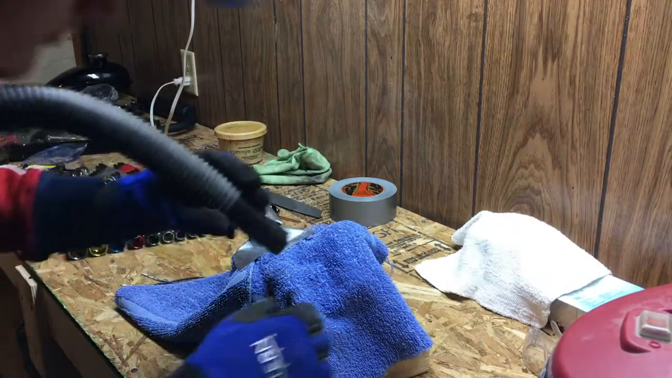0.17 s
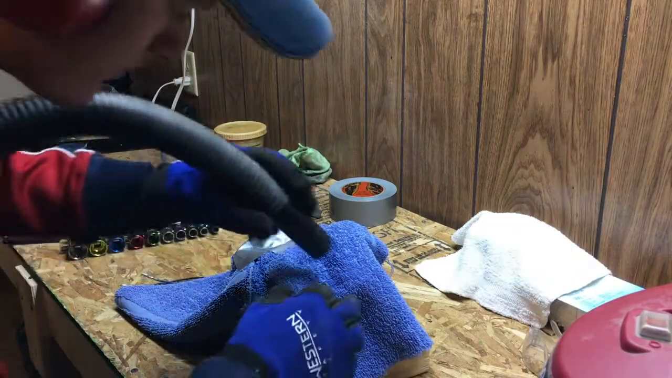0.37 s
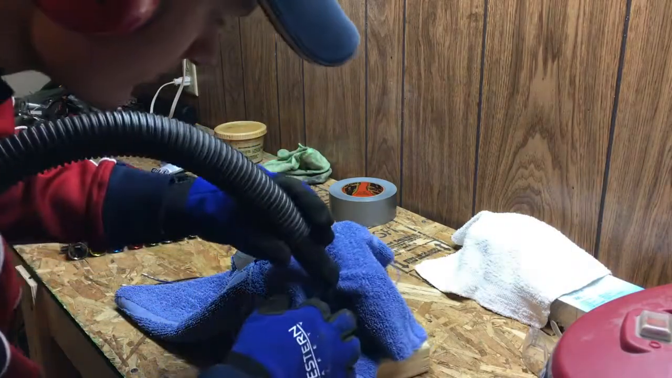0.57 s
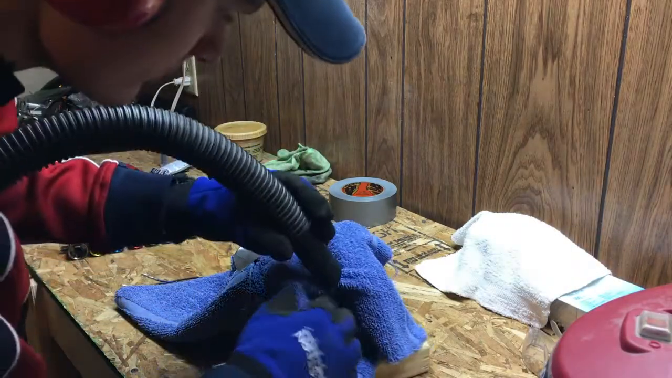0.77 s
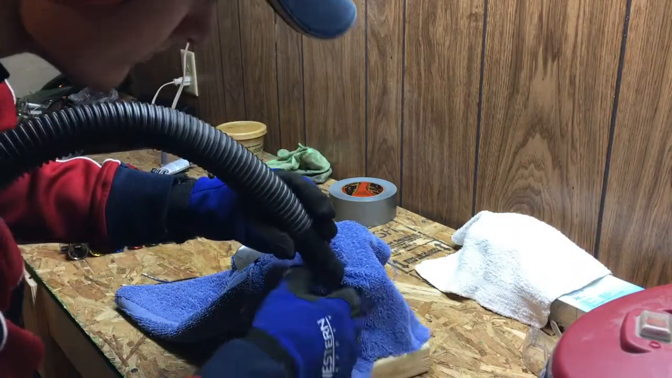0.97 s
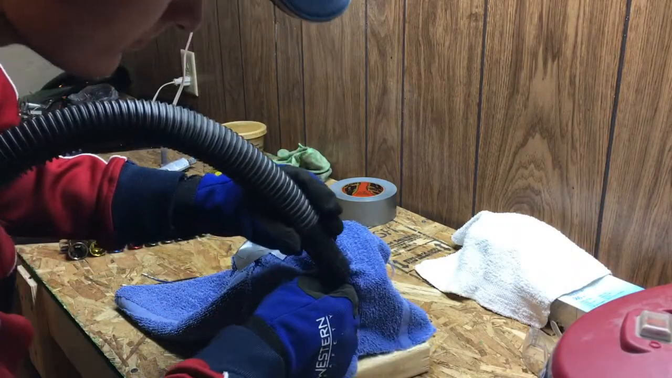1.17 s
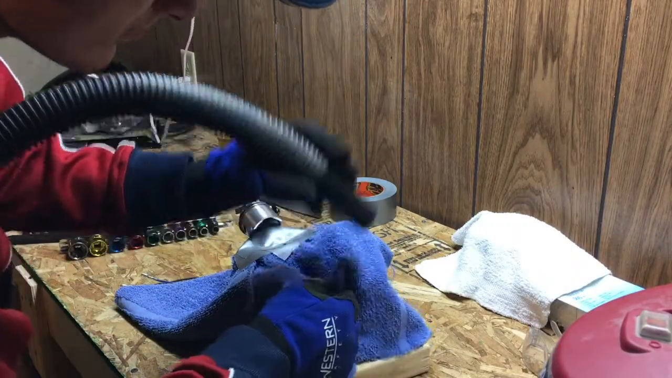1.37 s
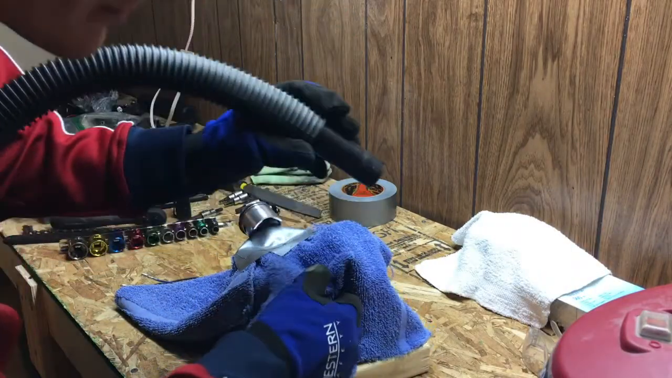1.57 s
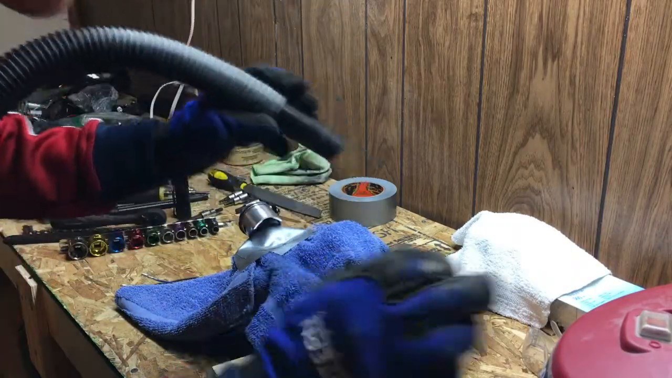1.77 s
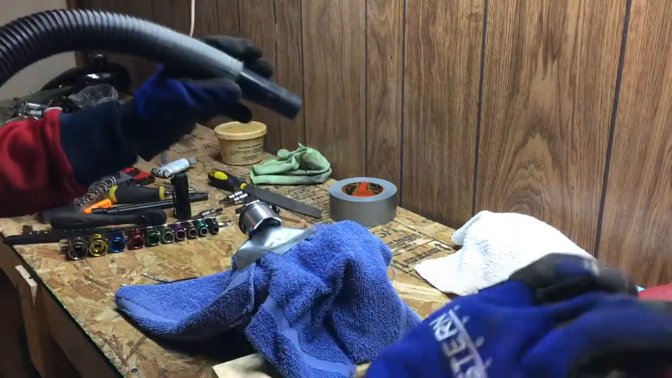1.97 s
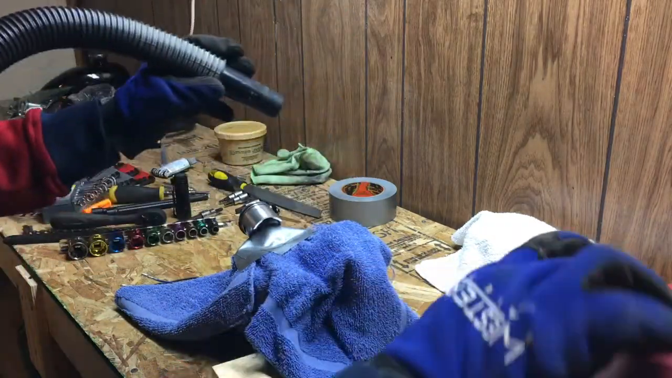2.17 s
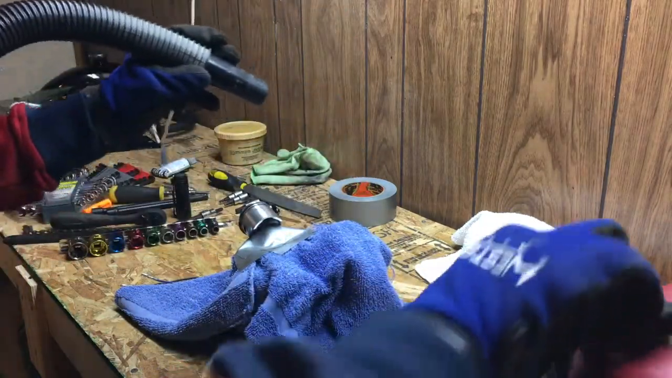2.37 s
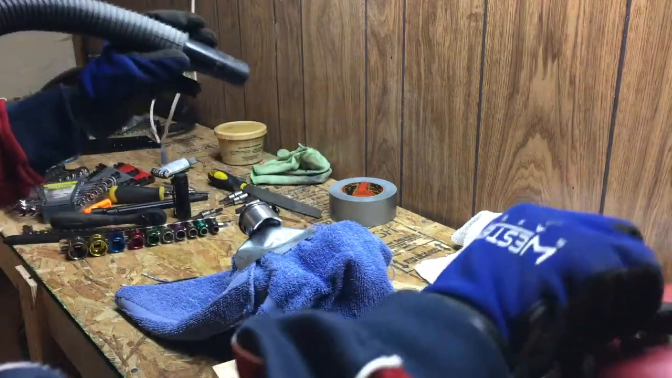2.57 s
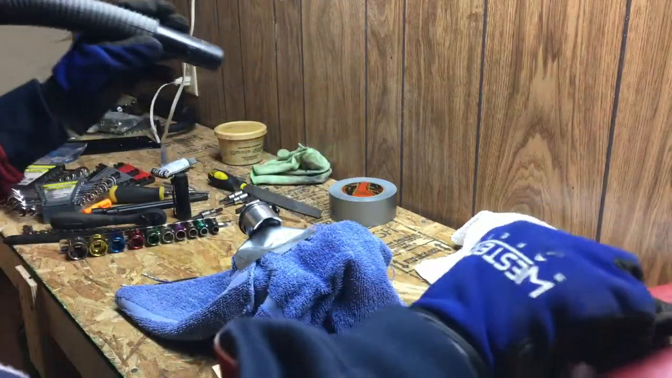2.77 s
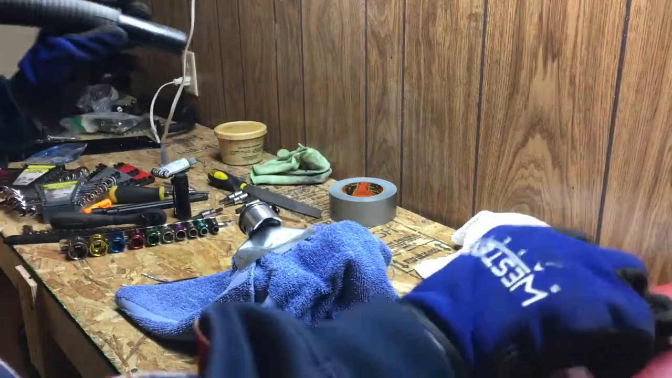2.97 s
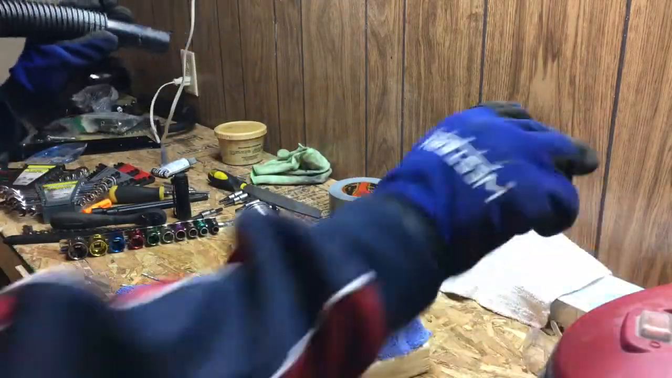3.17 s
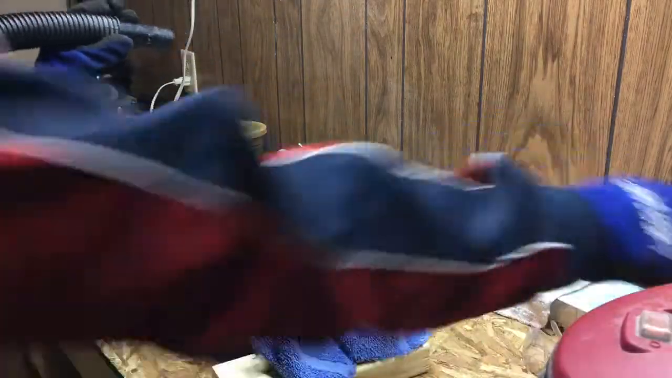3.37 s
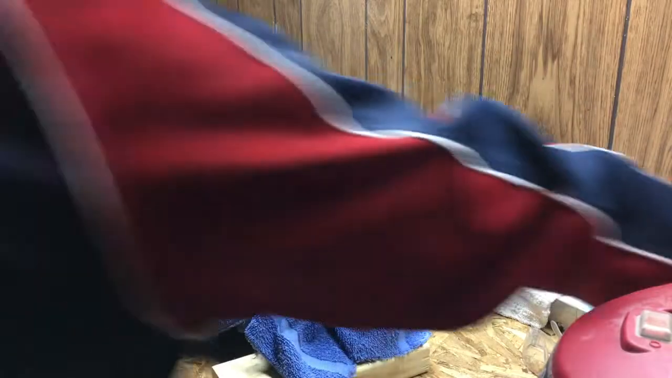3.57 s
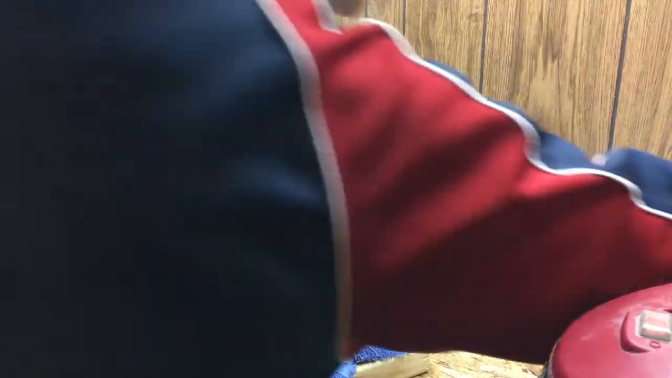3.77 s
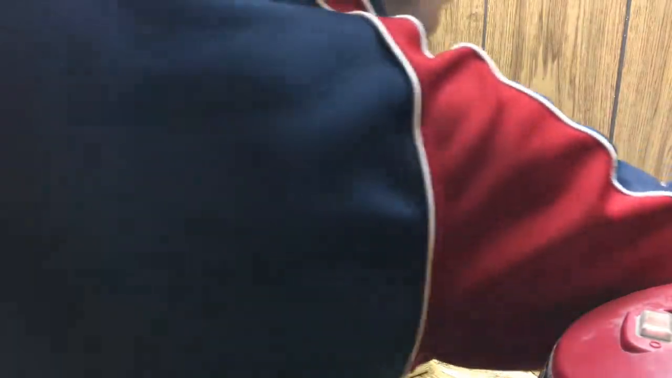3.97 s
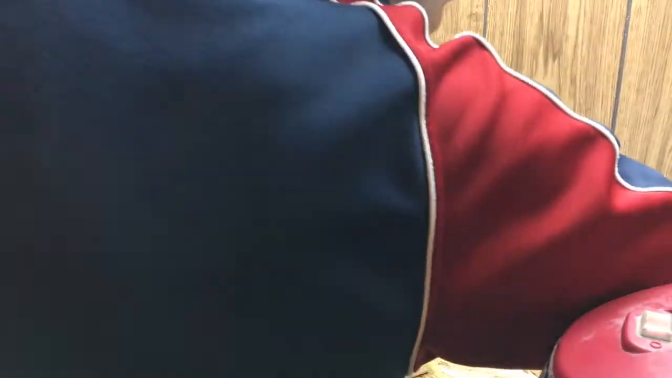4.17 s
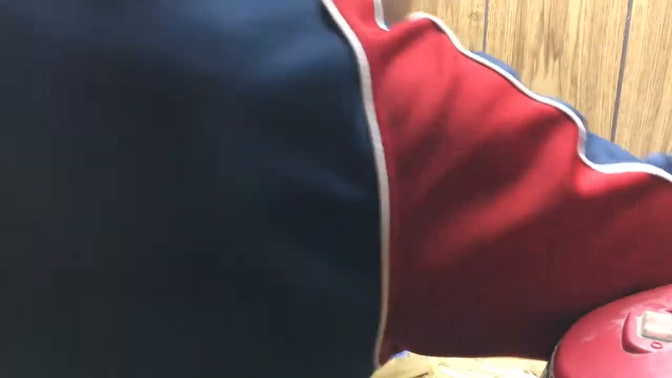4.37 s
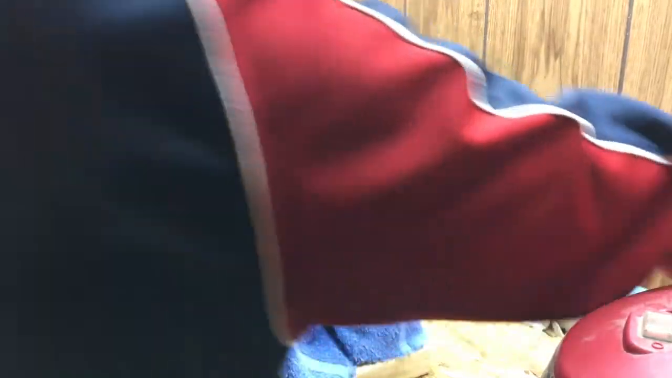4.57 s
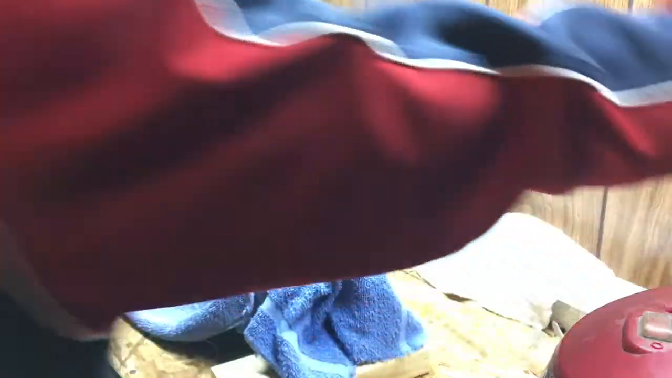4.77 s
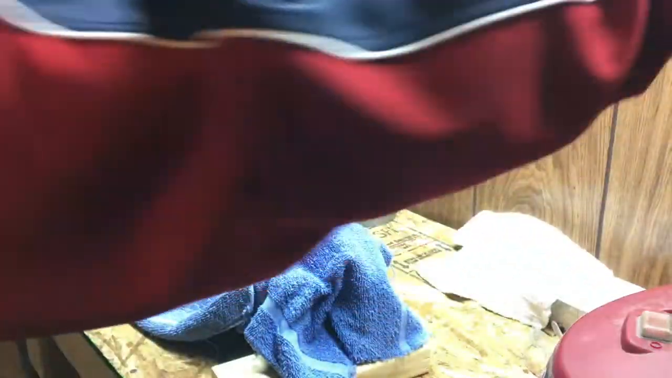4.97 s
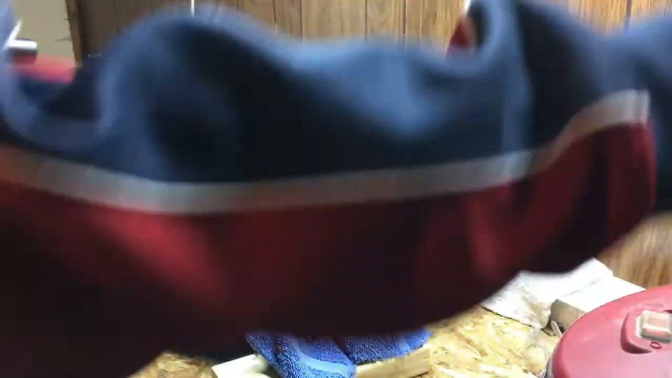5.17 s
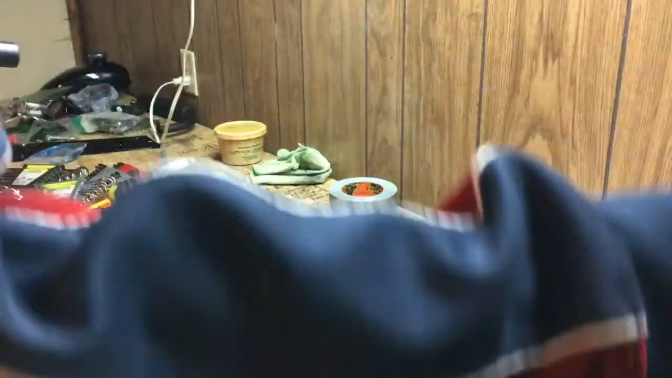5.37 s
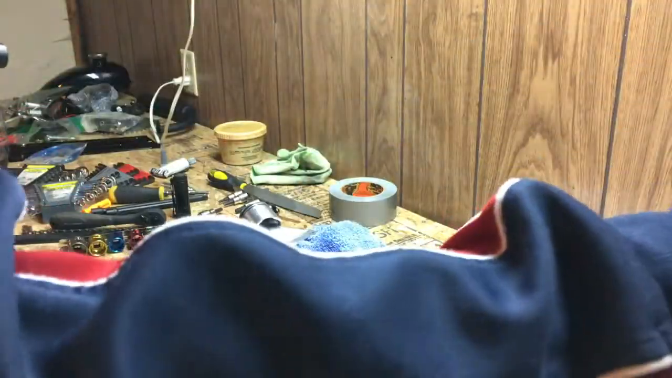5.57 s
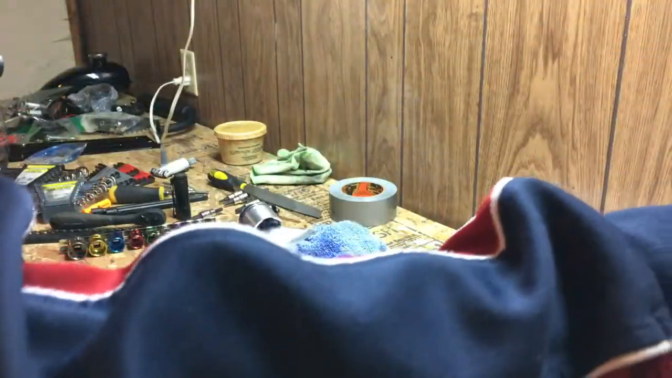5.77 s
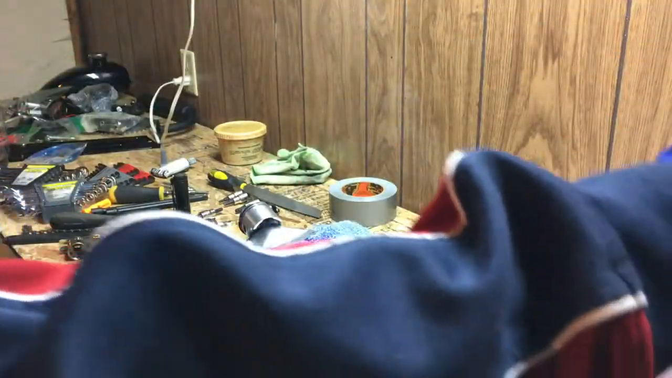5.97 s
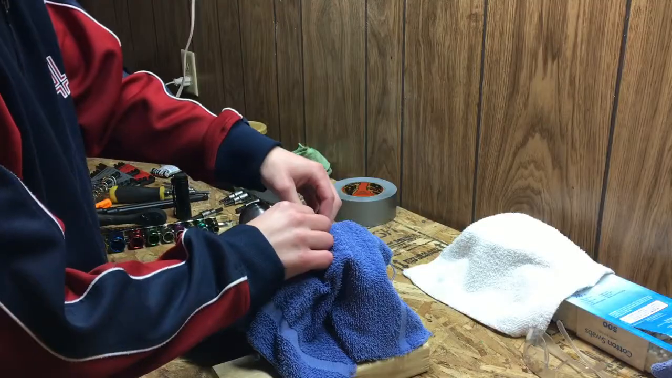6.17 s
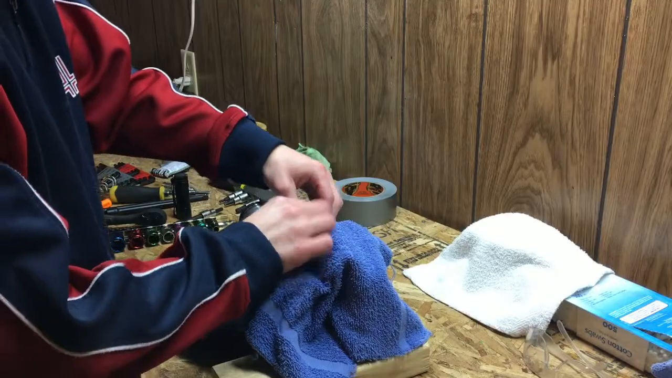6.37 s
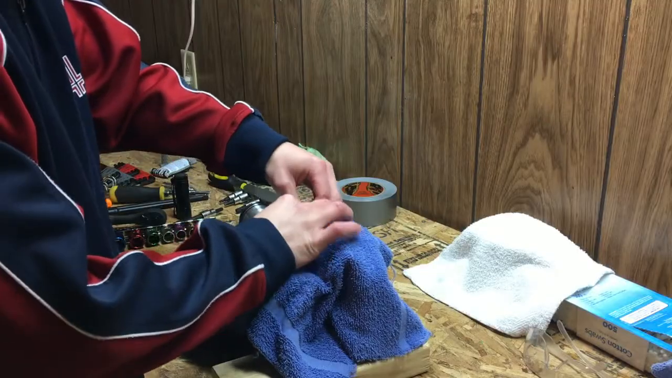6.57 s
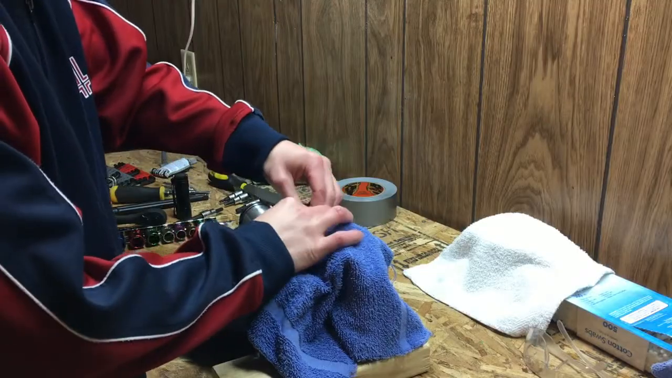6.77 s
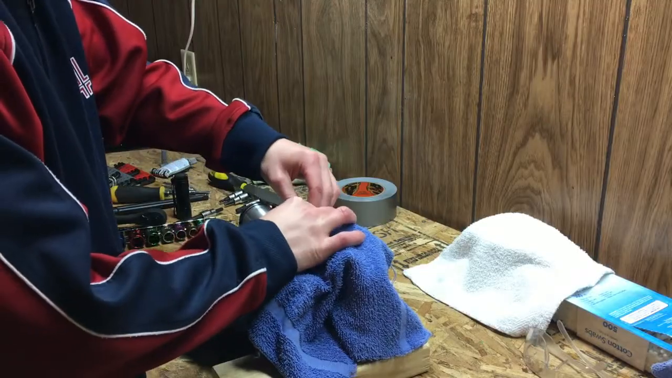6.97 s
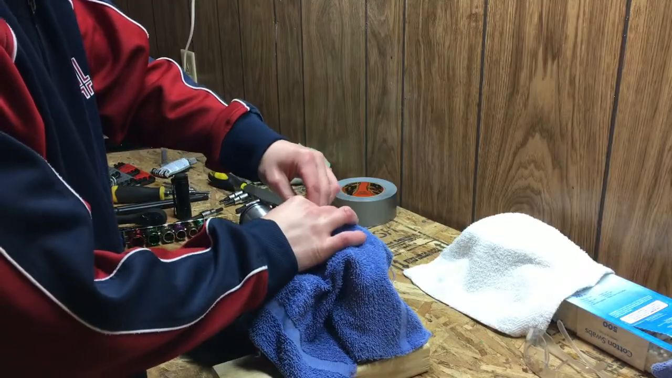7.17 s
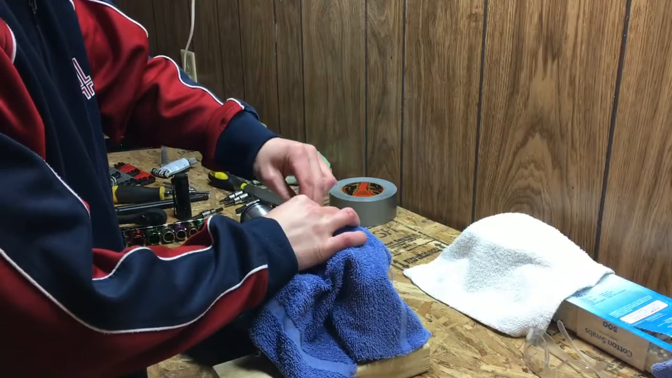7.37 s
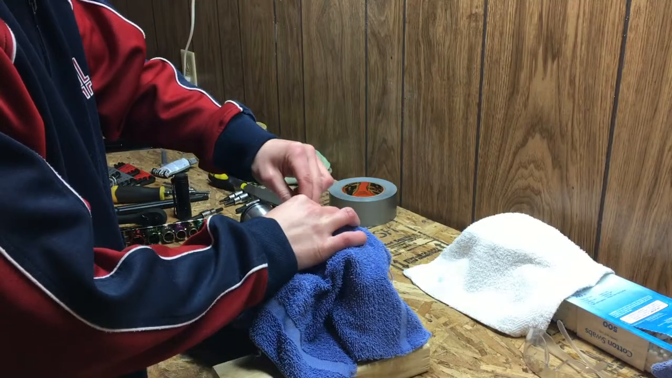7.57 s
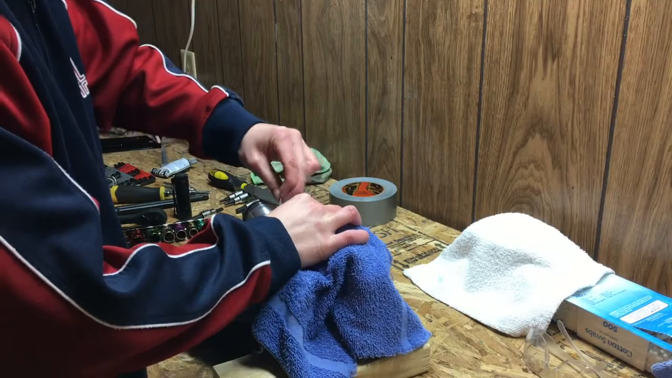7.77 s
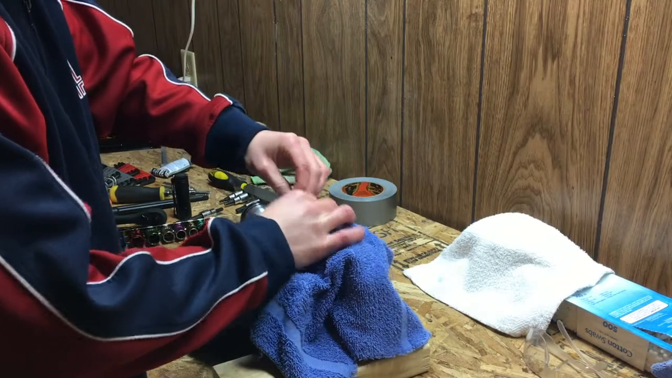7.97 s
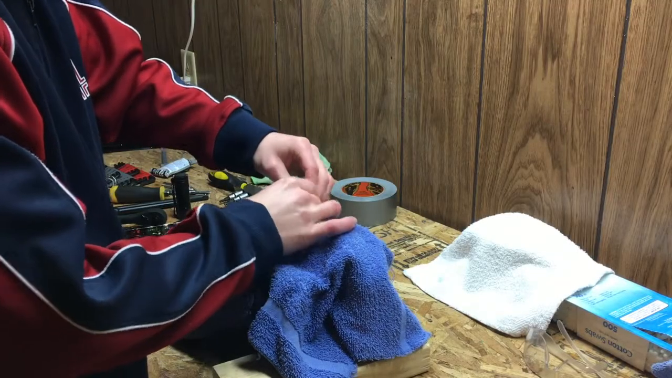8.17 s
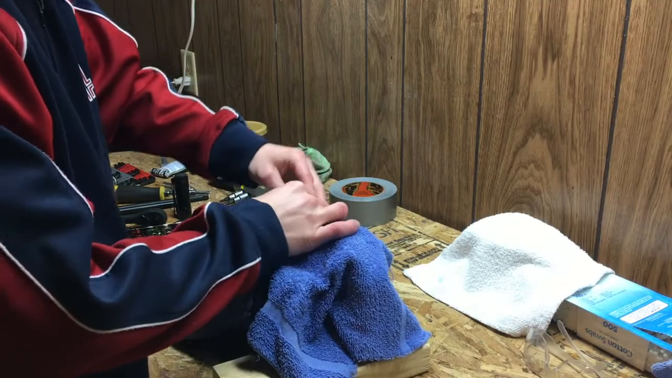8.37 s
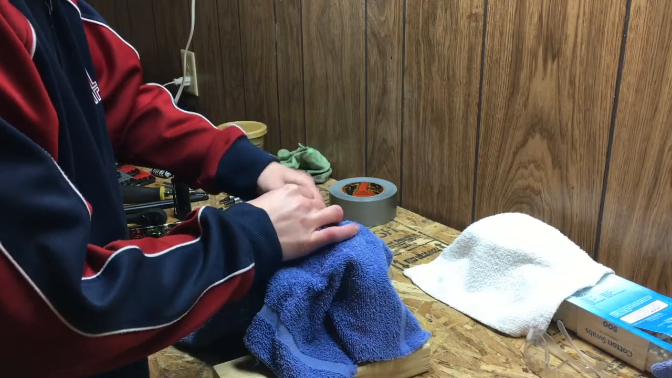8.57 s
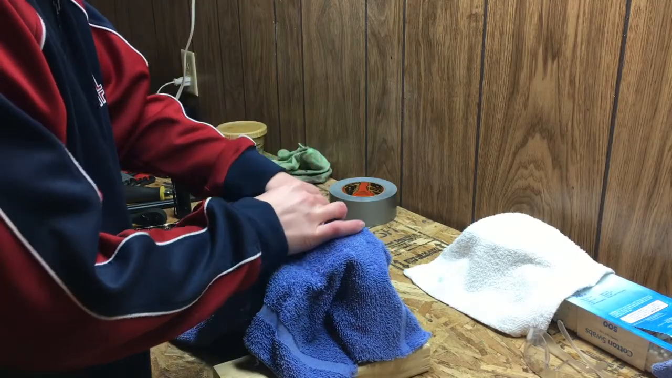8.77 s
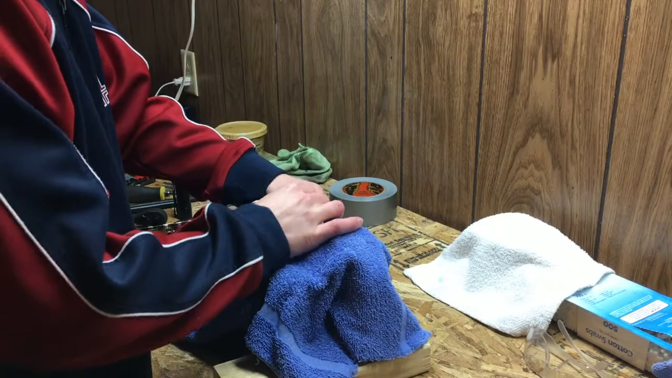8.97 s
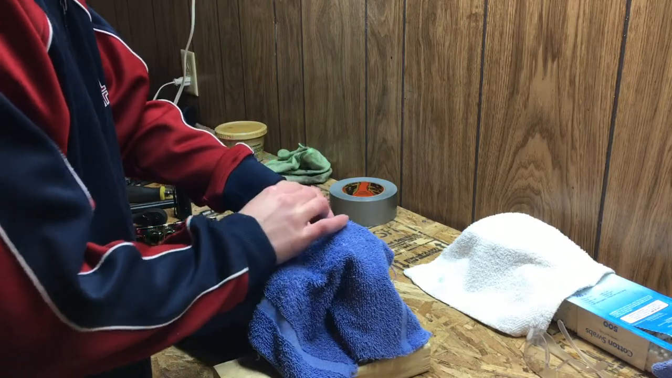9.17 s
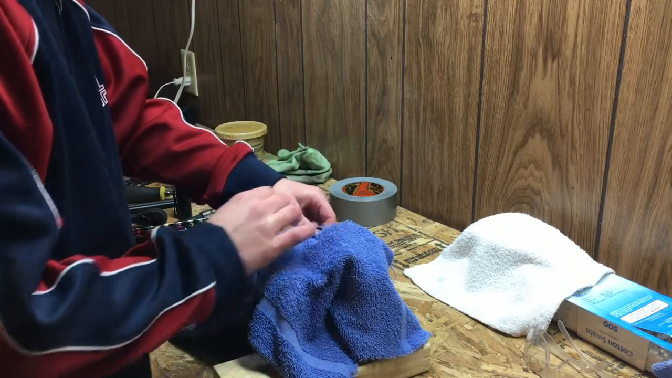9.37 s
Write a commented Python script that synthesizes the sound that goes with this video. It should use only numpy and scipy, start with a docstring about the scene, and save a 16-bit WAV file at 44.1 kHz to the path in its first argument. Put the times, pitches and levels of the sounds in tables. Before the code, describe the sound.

A shop vacuum rushes and whines steadily close by in a small workshop. A towel briefly chokes the nozzle and the pitch rises, then eases back. Switched off, it coasts down in a long falling whine, jumping louder once partway, with bumps, scrapes and small metal clinks over it. The last whirr stops short, leaving mains hum, a few hard bench knocks, light clicks and a final soft thump with cloth rustle. One microphone, slight room echo.

```python
"""A shop vacuum rushes and whines over a mains hum, and speeds up while a towel chokes its nozzle.
Switched off, it coasts down: shaft speed drives air noise, fan tones and brushes singing on the commutator.
The level steps up once during the run-down, and later the whirr stops short.
Rubs, scrapes and rattles (noise swells), blows on a wooden bench and sheet metal (filtered bursts, thuds)
and steel clinks (decaying sines) echo in the workshop; one microphone."""
import sys
import numpy as np
from scipy import signal
from scipy.fft import rfft, irfft
from scipy.io import wavfile

SR = 44100
rng = np.random.default_rng(int(sys.argv[2]) if len(sys.argv) > 2 else 0)


def to_wav(sig):
    """Store sig (one row per channel, or 1-D mono) as 16-bit WAV at the path in sys.argv[1].

    Samples outside -1..1 are clipped; the rate is SR.
    """
    pcm = np.clip(np.atleast_2d(sig), -1, 1) * 32767
    pcm = np.round(pcm).astype(np.int16)
    wavfile.write(sys.argv[1], SR, pcm.T)  # frames by channels


N = 415422
TIME_S = np.arange(N) / SR
BIN_HZ = np.maximum(np.arange(N // 2 + 1) * SR / N, 1)
CUTOFF_HZ = 15900
MAINS_HZ = 60
OFF_S, STEP_S, STOP_S = 2.444, 3.24, 6.02  # motor power off, level step, end of whirr
START_TURNS_PER_S, FULL_TURNS_PER_S, CHOKED_TURNS_PER_S = 414, 418, 435.5


def from_db(db):
    """Decibels to gain."""
    return 10 ** (np.asarray(db) / 20)


def rms_one(x):
    """Scale to an rms of 1."""
    return x / np.sqrt(np.mean(x ** 2) + 1e-20)


def at_hz(points, hz):
    """Read a spectrum on a log-frequency axis."""
    point_hz, point_db = np.array(points)[:, :2].T
    return np.interp(np.log(hz), np.log(point_hz), point_db)


def bell(hz, centre_hz, width_hz):
    """Power response of one resonance."""
    return 1 / (1 + (2 * (hz - centre_hz) / width_hz) ** 2)


def noise(spectrum, modes=()):
    """Noise with a broad colour, lifted at its resonances; rms 1."""
    lift_db = sum(lift * bell(BIN_HZ, hz, width) for hz, width, lift in modes)
    white = rfft(rng.standard_normal(N))
    return rms_one(irfft(white * from_db(at_hz(spectrum, BIN_HZ) + lift_db), N))


def split(x, centres_hz):
    """Overlapping bands that add up to x again."""
    whole = rfft(x)
    shares = np.eye(len(centres_hz))
    return [irfft(whole * np.interp(np.log(BIN_HZ), np.log(centres_hz), share), N) for share in shares]


def drift(rate_hz):
    """Slow random wander; rms 1."""
    return rms_one(irfft(rfft(rng.standard_normal(N)) / (1 + (BIN_HZ / rate_hz) ** 2), N))


# echo bands: f/Hz, t60/s, relative level/dB
WORKSHOP_ECHO = [(81.4, 0.58, 4), (254, 0.64, -5), (700, 0.31, -5), (2000, 0.61, -6), (5870, 0.13, -4),
                 (13900, 0.2, -6)]


def workshop(x):
    """Diffuse wall echoes: noise bands, each with its own decay."""
    age_s = TIME_S[:SR]
    bands = split(rng.standard_normal(N), [row[0] for row in WORKSHOP_ECHO])
    tail = 0
    for band, (_, t60_s, db) in zip(bands, WORKSHOP_ECHO):
        unit_energy = np.sqrt(2 * np.log(1000) / (t60_s * SR))
        tail = tail + band[:SR] * from_db(db - 60 * age_s / t60_s) * unit_energy
    return signal.fftconvolve(x, tail * (age_s > .004))[:N]


def settle(start_s, lag_s=.19):
    """Goes from 0 to 1 after start_s, with the lag of the motor."""
    return 1 - np.exp(-np.maximum(TIME_S - start_s, 0) / lag_s)


def shaft(choke):
    """Turns per s: a choked fan moves less air and runs faster; unpowered, friction and drag slow it."""
    running = START_TURNS_PER_S + (FULL_TURNS_PER_S - START_TURNS_PER_S) * settle(0)
    running = running + (CHOKED_TURNS_PER_S - FULL_TURNS_PER_S) * choke
    speed_shares = np.linspace(1, 0, 2000)
    # turns/s lost each s: brush friction + fan drag
    loss = 33.6 + 436 * speed_shares ** 2.12
    reached_s = OFF_S + np.cumsum(FULL_TURNS_PER_S / len(speed_shares) / loss)
    return running * np.interp(TIME_S, reached_s, speed_shares)


# machine voices: gain/dB, choked change/dB, coasting change/dB, speed under which it dies/(turns/s)
AIR_VOICE = (-16.5, -0.43, 3.5, 37.5)
WHINE_VOICE = (7.5, -1.5, -5, 129)
BRUSH_VOICE = (0.5, 0.5, -3.5, 37.5)


def voice_db(voice, turns, choke):
    """A voice's gain follows the blockage and the slowing shaft, and dies away near standstill."""
    gain_db, choked_db, coasting_db, dying_turns_per_s = voice
    # coasting change is complete below 0.4 of full speed
    coasting = np.clip((1 - turns / FULL_TURNS_PER_S) / (1 - 0.4), 0, 1)
    dying_db = 20 * np.log10(1 + (dying_turns_per_s / turns) ** 5)
    return gain_db + choked_db * choke + coasting_db * coasting - dying_db


# rushing air spectrum: f/Hz, relative density/(dB per Hz)
AIR_SPECTRUM = [(25, -27), (45, -17.5), (70, -0.5), (100, -8), (160, 1), (520, -11.5), (1000, -14),
                (2500, -1.5), (4000, -6), (8000, -9), (10700, -13.5), (12000, -8.5), (15600, -15.5)]
# drum and hose resonances: f/Hz, width/Hz, lift/dB
DRUM_MODES = [(170.4, 12, -4), (300.8, 16, 8), (360, 42, 12), (424, 39, 6.5), (723, 130, 11.5),
              (914, 243, 7.5), (1169, 220, 13.5), (1317, 43, 7.5), (1685, 155, 6), (1842, 19, 10),
              (2080, 200, 4.5), (2830, 210, 3.5), (3120, 75, 5.5), (4400, 51, 6.5), (6600, 170, 4)]
# fading of the air with speed: f/Hz, exponent of speed for amplitude
AIR_FADE = [(60, 1.18), (150, 2.24), (400, 1.77), (1100, 2.19), (2600, 2.34), (5000, 2.92), (12000, 3.8)]


def air(speed, gain_db, flutter_db):
    """Turbulence rings in drum and hose, and dulls as the fan slows."""
    centres_hz, powers = np.transpose(AIR_FADE)
    out = 0
    for band, power in zip(split(noise(AIR_SPECTRUM, DRUM_MODES), centres_hz), powers):
        out = out + band * speed ** power * from_db(flutter_db * drift(11))
    return from_db(gain_db) * out


# shaft and fan tones: multiple of shaft speed, relative level/dB, exponent of speed
SHAFT_ORDERS = [(1, -43, .7), (2, -48, .7), (3, -47, 1.2), (9, -37.5, 9), (12, -42, 5), (18, -42, .6),
                (24, -44.5, 9), (36, -51, 8)]
# duct modes that make the fan tones whistle: f/Hz, width/Hz, lift/dB
DUCT_MODES = [(1750, 300, 6), (2300, 700, 7.5), (3200, 600, 5), (3760, 200, 2), (4700, 900, -3),
              (6550, 900, 6), (7850, 200, 6), (10420, 250, 5)]
BLADES, BLADE_CHOKE_DB = 9, -16  # the blade tone needs flow through the nozzle


def whine(angle, speed, choke, waver):
    """Unbalance and fan blades give tones that waver in the turbulent air."""
    out = 0
    for multiple, db, power in SHAFT_ORDERS:
        tone_hz = multiple * speed * FULL_TURNS_PER_S
        lift_db = sum(lift * bell(tone_hz, hz, width) for hz, width, lift in DUCT_MODES)
        lift_db = lift_db + BLADE_CHOKE_DB * choke * (multiple == BLADES)
        tone = (1 + waver * drift(21)) * np.sin(multiple * angle)
        tone = tone + waver * drift(25) * np.cos(multiple * angle)
        out = out + np.sqrt(2) * from_db(db + lift_db) * speed ** power * tone
    return out


# motor housing modes under the brushes: f/Hz, width/Hz, relative level/dB
HOUSING_MODES = [(1950, 300, 3), (2850, 250, 2), (3490, 170, 6), (4150, 400, -2), (5350, 600, -1),
                 (6100, 300, -4), (9080, 280, 5), (11900, 300, -1), (13200, 300, 3), (13800, 500, -3)]
# brush hiss spectrum: f/Hz, relative density/(dB per Hz)
BRUSH_SPECTRUM = [(300, -4.5), (1500, -24), (3000, -1), (4700, -5.5), (6000, 4.5), (7800, -7), (9100, 6.5),
                  (10600, 1.5), (12000, 9), (13500, 3.5), (15600, -5.5)]


def brushes(angle, turns, sing_db, hiss_db, power, bars=12):
    """Commutator bars tick past the brushes; harmonics light up as they slide through housing modes."""
    singing, coarse_turns = 0, turns[::64]
    for k in range(1, 28):
        hz = k * bars * coarse_turns
        response = sum(from_db(db) ** 2 * bell(hz, centre, width) ** 2
                       for centre, width, db in HOUSING_MODES)
        gain = np.interp(TIME_S, TIME_S[::64], np.sqrt(response) * (hz < CUTOFF_HZ))
        singing = singing + gain * np.sin(k * bars * angle + rng.uniform(0, 2 * np.pi))
    scratchy = singing * (1 + .5 * drift(60))
    hiss = from_db(hiss_db) * noise(BRUSH_SPECTRUM)
    return (turns / FULL_TURNS_PER_S) ** power * (from_db(sing_db) * scratchy + hiss)


# drum modes: f/Hz, width/Hz, relative level/dB
BOOM_MODES = [(182, 22, -37.5), (230, 15, -44), (290, 39, -39.5), (351, 49, -45)]
# driving tones: multiples of shaft speed
BOOM_MULTIPLES = (1, 2, 4)
# their drive/dB
BOOM_DRIVE_DB = (-15, 0.5, -16.5)


def drum_boom(angle, turns):
    """The drum booms as the lowest tones slide through its modes."""
    return sum(from_db(db + drive_db) * bell(k * turns, hz, width) * np.sin(k * angle)
               for hz, width, db in BOOM_MODES for k, drive_db in zip(BOOM_MULTIPLES, BOOM_DRIVE_DB))


def vacuum():
    """Shaft speed drives air, whine and brushes; the motor buzzes only while it has power."""
    choke = settle(.58) - settle(1.38)  # towel on, towel off
    turns = shaft(choke)
    speed = turns / FULL_TURNS_PER_S
    angle = 2 * np.pi * np.cumsum(turns * (1 + .0008 * drift(20))) / SR
    powered = np.clip((OFF_S - TIME_S) * 20, 0, 1)
    buzz = from_db(-33.5) * np.sin(2 * np.pi * 2 * MAINS_HZ * TIME_S) * powered
    fan = from_db(voice_db(WHINE_VOICE, turns, choke)) * whine(angle, speed, choke, waver=0.22)
    brush = brushes(angle, turns, sing_db=-40, hiss_db=-33.5, power=0.96)
    motor = fan + from_db(voice_db(BRUSH_VOICE, turns, choke)) * brush
    # machine stands off on the floor: wall echoes smear its gliding tones
    motor = .85 * motor + .75 * workshop(motor)
    rush = air(speed, voice_db(AIR_VOICE, turns, choke), flutter_db=1.0)
    out = motor + buzz + drum_boom(angle, turns) + rush
    step_db = 12.22 * (TIME_S > STEP_S)
    return out * from_db(step_db) * (TIME_S < STOP_S)


# mains hum: multiple of mains frequency, level/dB
MAINS_HUM = [(1, -51), (2, -52.5), (3, -63), (4, -64.5), (5, -72), (7, -74)]
# still room spectrum: f/Hz, relative density/(dB per Hz)
ROOM_SPECTRUM = [(25, -22.5), (55, 11), (90, 2.5), (200, -7), (400, -9), (800, -18), (2000, -20),
                 (5000, -25), (9000, -24), (10500, -23.5), (12500, -20.5), (15600, -23)]


def background(floor_db):
    """Mains hum, its harmonics peaking together once a cycle, over the faint noise of the room."""
    hum = sum(np.sqrt(2) * from_db(db) * np.cos(2 * np.pi * multiple * MAINS_HZ * TIME_S)
              for multiple, db in MAINS_HUM)
    return hum + from_db(floor_db) * noise(ROOM_SPECTRUM)


# swells of rubbing, scraping and rattling: centre t/s, length/s, rustle level/dB, rumble level/dB
SWELLS = [(3.9, 0.92, -51, -38), (4.393, 0.37, -48, -30), (5.251, 0.1, -30.5, -29),
          (5.473, 0.03, -32.5, -37), (5.787, 0.26, -45.5, -49), (6.6, 0.32, -62, -65),
          (7.334, 0.1, -60.5, -49), (7.797, 0.078, -34.5, -41), (8.014, 0.27, -59.5, -55),
          (8.38, 0.085, -51.5, -61), (9.187, 0.16, -45.5, -53), (9.3, 0.12, -50, -30.5)]
# rustle spectrum: f/Hz, relative density/(dB per Hz)
RUSTLE_SPECTRUM = [(200, -25.5), (800, -8.5), (2200, -3), (5000, -10), (13000, -10), (16000, -15)]
# rumble spectrum: f/Hz, relative density/(dB per Hz)
RUMBLE_SPECTRUM = [(25, -30), (40, -10.5), (90, -23), (200, -5), (400, -15), (1000, -21), (4000, -69)]


def rubs_and_rattles(grain_db):
    """Cloth, and loose parts after a blow, rub, scrape and rattle: grainy rustle and rumble in swells."""
    rustle = rms_one(noise(RUSTLE_SPECTRUM) * from_db(grain_db * drift(70)))
    rumble = noise(RUMBLE_SPECTRUM)
    out = np.zeros(N)
    for centre_s, length_s, rustle_db, rumble_db in SWELLS:
        swell = np.exp(-(2 * (TIME_S - centre_s) / length_s) ** 2)
        out += swell * (from_db(rustle_db) * rustle + from_db(rumble_db) * rumble)
    return out


# knocks, dull to hard, on the bench and on a sheet-metal body:
# t/s, strength/dB, thud f/Hz, hardness/(dB per band)
KNOCK_BLOWS = [(4.113, -13, 188, -10), (4.315, -17, 62, -18), (5.116, -9.5, 734, -4),
               (5.202, -10.5, 664, -7.5), (5.224, -13.5, 818, -16), (6.609, -32, 460, -0.3),
               (7.397, -14, 85.5, 2), (7.726, -9.5, 156, 1.3), (7.737, -17, 158, 2.5),
               (7.749, -10.5, 90.5, -0.2)]
# soft low thumps; the one at 5.777 s is the drum booming as the shaft slows: t/s, strength/dB, thud f/Hz
LOW_THUMPS = [(4.292, -19, 52), (5.203, -20, 190), (5.369, -24, 273), (5.777, -26, 187), (5.856, -27, 114),
              (8.005, -31, 238), (8.307, -37.5, 197), (9.224, -8, 200), (9.296, -18, 230)]
# light clicks of small parts: t/s, strength/dB, hardness/(dB per band)
LIGHT_CLICKS = [(4.495, -27, 2.5), (4.534, -30, 4), (5.183, -13, 0), (5.189, -20, 1.5), (5.226, -31.5, 6.5),
                (5.535, -28, -1), (5.972, -34, -0.5), (8.376, -29, -0.2), (8.492, -34, 3.5),
                (8.658, -41, -.5), (9.034, -41.5, -0.5), (9.121, -32, -1), (9.205, -25, -3.5),
                (9.257, -32.5, 5), (9.32, -26, -3.5), (9.344, -27.5, -3), (9.383, -26, -0.5)]
# colour of each kind of blow: thud/dB, body/dB, crack/dB, tick/dB, sparkle/dB
THUMP_COLOUR_DB = (2, -12.5, -20, -23, -26)
KNOCK_COLOUR_DB = (-4, -0.5, 1.5, 2, -2)
CLICK_COLOUR_DB = (-19, -5, 1.5, 3.5, 1.5)
# crackle of gripping the towel
GRIP_S, GRIP_END_S, CRACKLE_DB, CRACKLE_SPREAD_DB = 9.125, 9.2, -39, 4


def blows(click_thud_hz, crackle_count=6):
    """Blows as (t/s, thud f/Hz, thud and band levels/dB): strength + colour + more treble when harder."""
    crackle = [(GRIP_S + (GRIP_END_S - GRIP_S) * when, CRACKLE_DB + CRACKLE_SPREAD_DB * (2 * size - 1), 0)
               for when, size in rng.random((crackle_count, 2))]
    steps = np.maximum(np.arange(len(KNOCK_COLOUR_DB)) - 1, 0)  # thud and body unaffected
    thumps = [(s, hz, db + np.array(THUMP_COLOUR_DB)) for s, db, hz in LOW_THUMPS]
    knocked = [(s, hz, db + np.array(KNOCK_COLOUR_DB) + hardness * steps)
               for s, db, hz, hardness in KNOCK_BLOWS]
    clicks = [(s, click_thud_hz, db + np.array(CLICK_COLOUR_DB) + hardness * steps)
              for s, db, hardness in list(LIGHT_CLICKS) + crackle]
    return thumps + knocked + clicks


# body, crack, tick, sparkle: low f/Hz, high f/Hz, t60/s, room echo/dB, echo t60/s
BLOW_BANDS = [(290, 1640, 0.038, -18, 0.44), (1170, 4020, 0.027, -18.5, 0.31),
              (4350, 8070, 0.017, -18.5, 0.23), (9400, 14300, 0.017, -19, 0.2)]
# modes of the things struck: f/Hz, width/Hz, lift/dB
STRUCK_MODES = [(364, 45, 6.5), (460, 40, 9.5), (570, 89, 12), (1220, 540, 6.5), (1660, 360, 8),
                (2530, 340, 6.5), (5760, 2900, 14.5), (12000, 5300, -7.5)]
# second mode of the thud: ratio to its pitch, relative level/dB
THUD_OVERTONE = (1.8, -10)
SPIKE_DB = -3.5  # first instant of contact, over the burst


def knocks(thud_t60_s, rise_s, contact_s):
    """A blow gives a spike, a burst in the struck modes, its diffuse echo, and a swelling, dying thud."""
    bursts, thuds = np.zeros(N + SR), np.zeros(N + SR)
    age_s = TIME_S[:SR // 2]
    ringing = noise([(1, 0), (SR, 0)], STRUCK_MODES)
    impulse = 1. * (age_s == 0) + 1e-18
    bands, spikes, shapes = [], [], []
    for low_hz, high_hz, t60_s, echo_db, echo_t60_s in BLOW_BANDS:
        sos = signal.butter(2, [low_hz, high_hz], "band", fs=SR, output="sos")
        bands.append(rms_one(signal.sosfilt(sos, ringing)))
        spike = signal.sosfilt(sos, impulse)
        spikes.append(from_db(SPIKE_DB) * spike / np.abs(spike).max())
        decay = np.hypot(from_db(-60 * age_s / t60_s), from_db(echo_db - 60 * age_s / echo_t60_s))
        shapes.append(decay * (1 - np.exp(-age_s / contact_s)))
    ratio, overtone_db = THUD_OVERTONE
    for s, thud_hz, (thud_db, *levels_db) in blows(click_thud_hz=190):
        start, pick = round(s * SR), rng.integers(0, N - len(age_s))
        span = slice(start, start + len(age_s))
        phase = 2 * np.pi * thud_hz * age_s
        modes = np.sin(phase) + from_db(overtone_db) * np.sin(ratio * phase)
        thuds[span] += from_db(thud_db - 60 * age_s / thud_t60_s) * modes * (1 - np.exp(-age_s / rise_s))
        for db, spike, shape, band in zip(levels_db, spikes, shapes, bands):
            bursts[span] += from_db(db) * (spike + shape * band[pick:pick + len(age_s)])
    return bursts[:N] + thuds[:N] + workshop(thuds[:N])


# touches of small steel parts: t/s, strength/dB
STEEL_CLINKS = [(4.494, -22), (4.534, -19)]
# steel modes: f/Hz, relative level/dB, t60/s
STEEL_MODES = [(4280, -13, 0.1), (4300, -11, 0.083), (4660, -13, 0.091), (5750, -5, 0.048),
               (7020, -2, 0.043)]


def clinks():
    """Each touch rings the steel's modes."""
    out = np.zeros(N)
    for s, db in STEEL_CLINKS:
        age_s = np.clip(TIME_S - s, 0, 1)
        for hz, mode_db, t60_s in STEEL_MODES:
            out += from_db(db + mode_db - 60 * age_s / t60_s) * np.sin(2 * np.pi * hz * age_s)
    return out


def scene():
    """Vacuum, handling and room, alike in both channels."""
    handling = rubs_and_rattles(grain_db=4.0) + clinks()
    struck = knocks(thud_t60_s=0.06, rise_s=0.00089, contact_s=0.00062)
    mono = vacuum() + background(floor_db=-52.5) + struck + handling + workshop(handling)
    return np.array([mono, mono])


def record(dry):
    """The microphone drops the deepest bass; peaks are clipped at full scale and the top is cut."""
    thin = signal.sosfilt(signal.butter(4, 33, "high", fs=SR, output="sos"), dry)
    top_cut = signal.cheby1(14, .2, CUTOFF_HZ, fs=SR, output="sos")
    return signal.sosfilt(top_cut, np.clip(thin, -1, 1))


dry = scene()
out = record(dry)
to_wav(out)
```